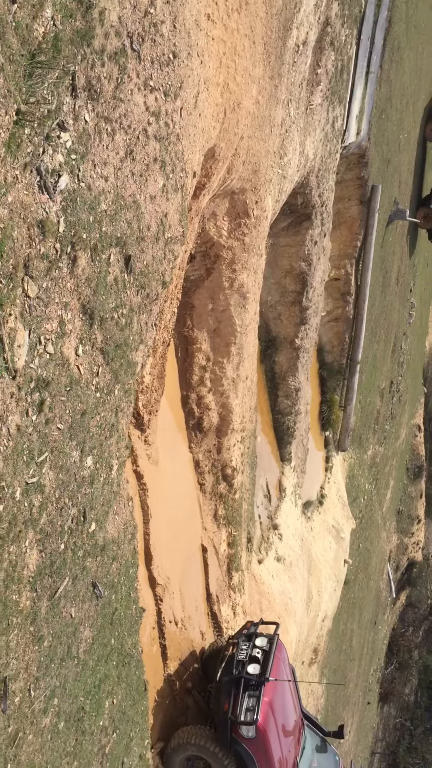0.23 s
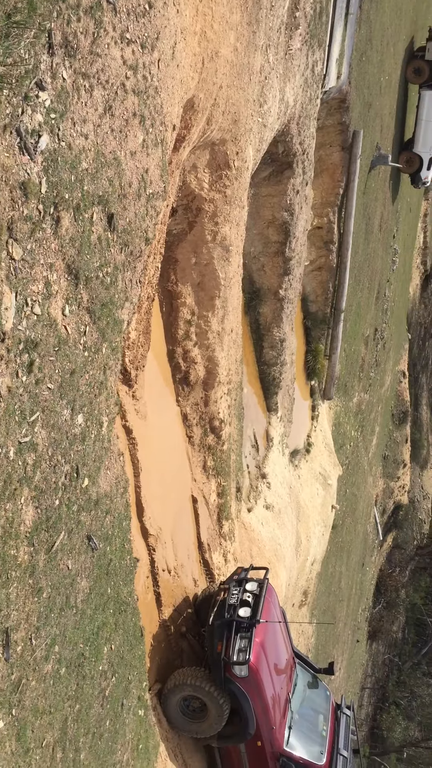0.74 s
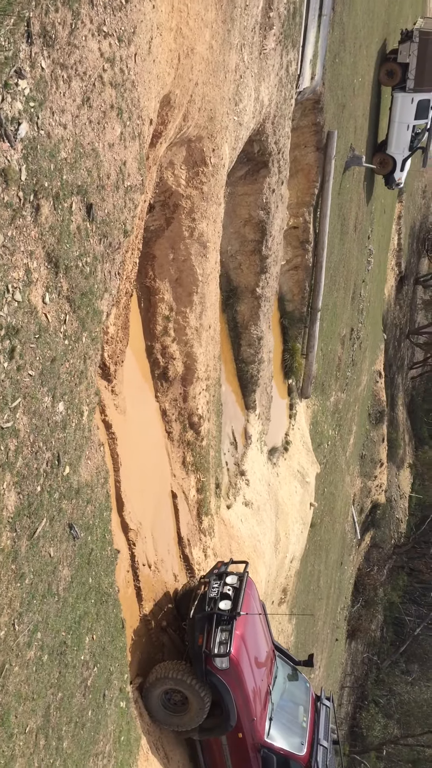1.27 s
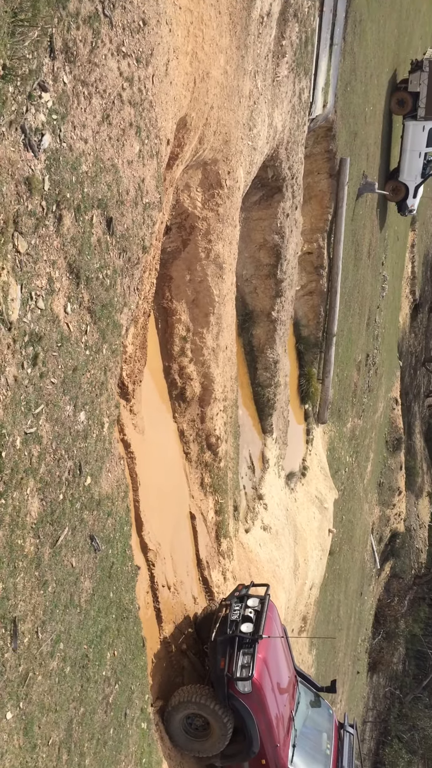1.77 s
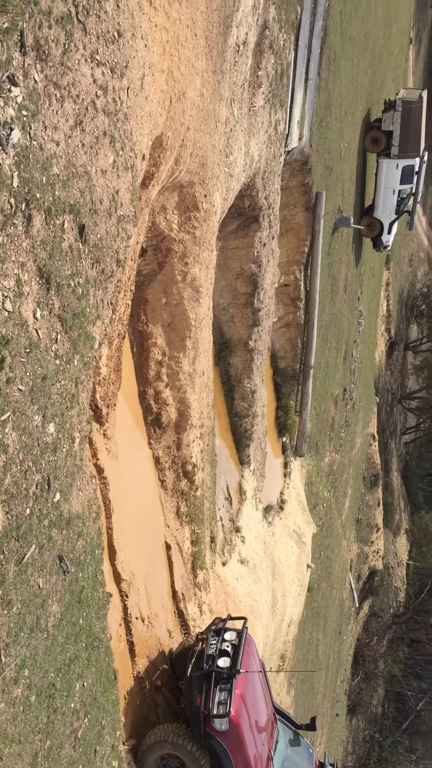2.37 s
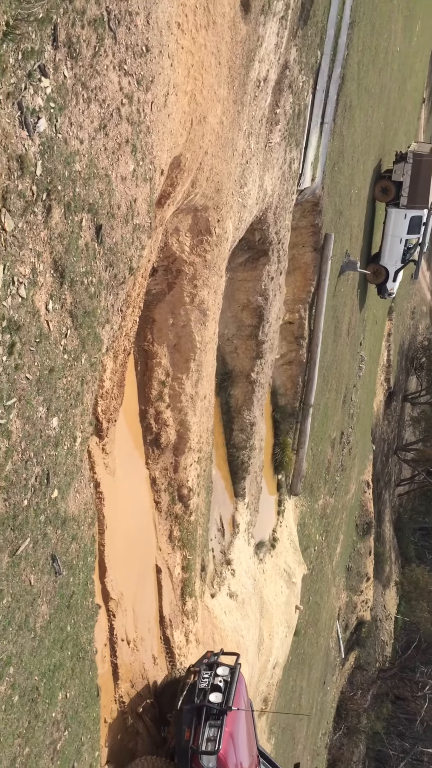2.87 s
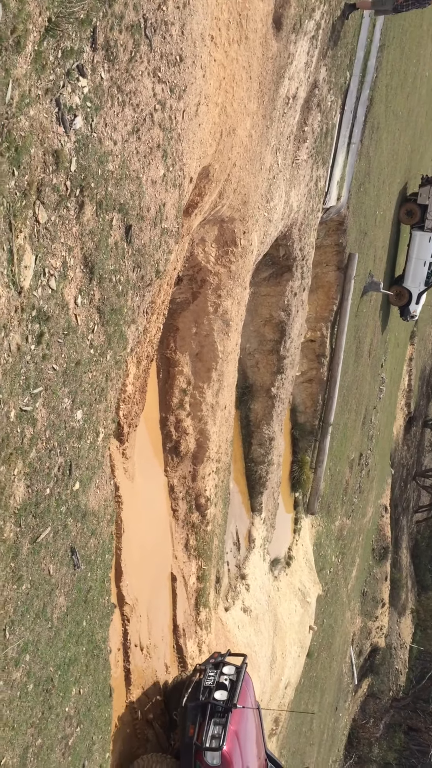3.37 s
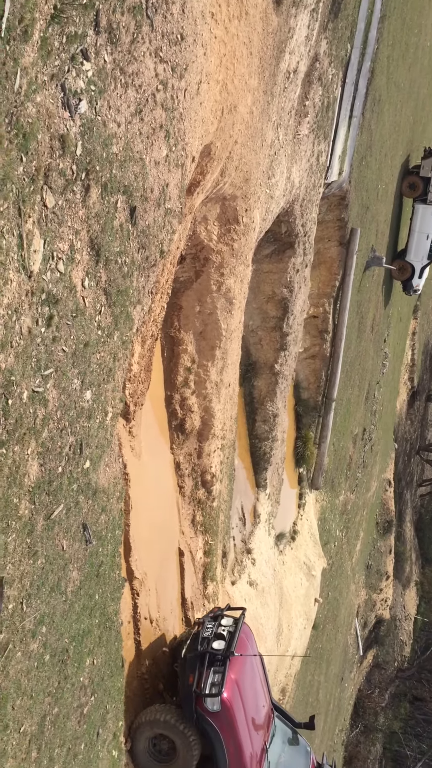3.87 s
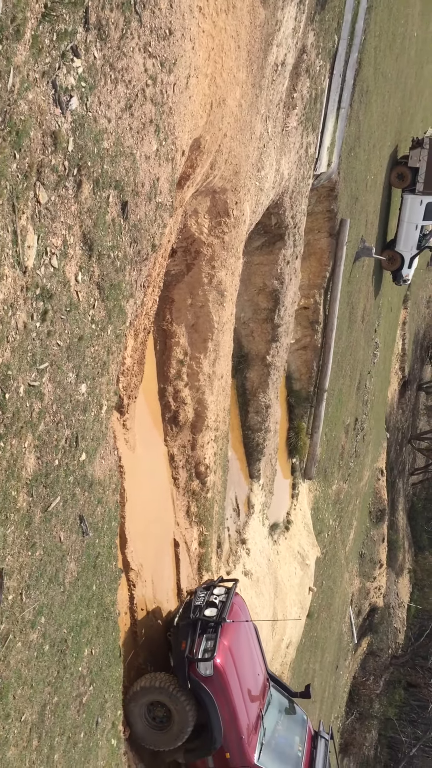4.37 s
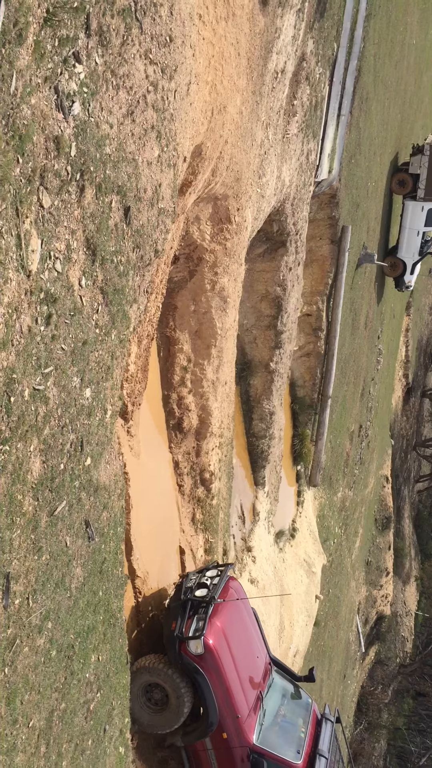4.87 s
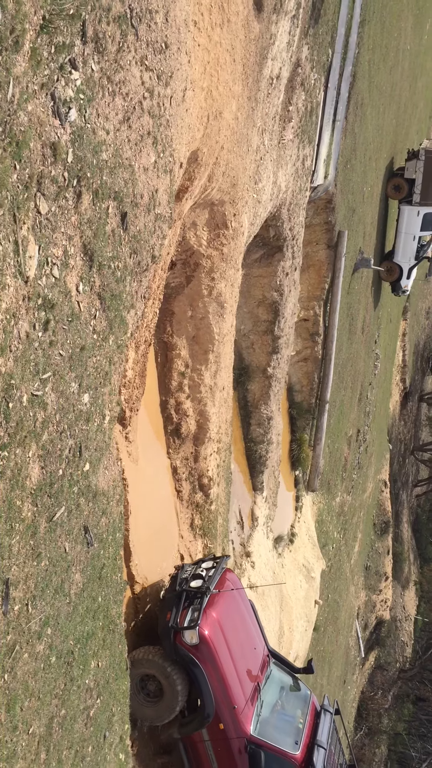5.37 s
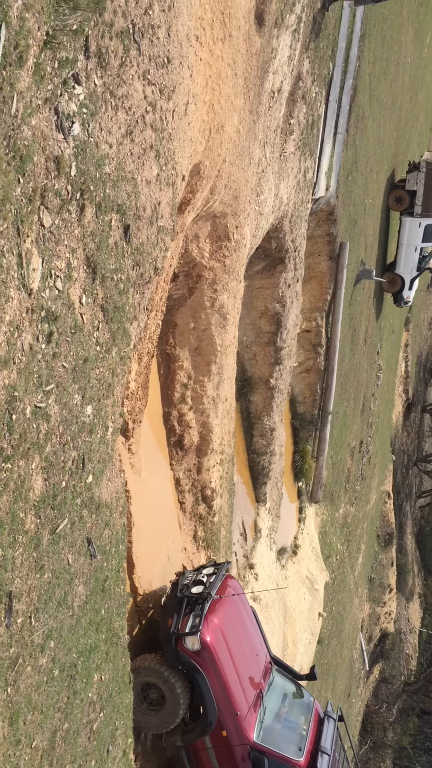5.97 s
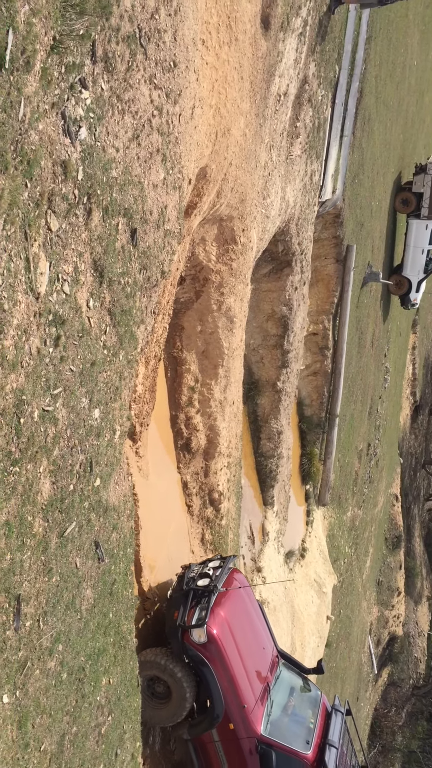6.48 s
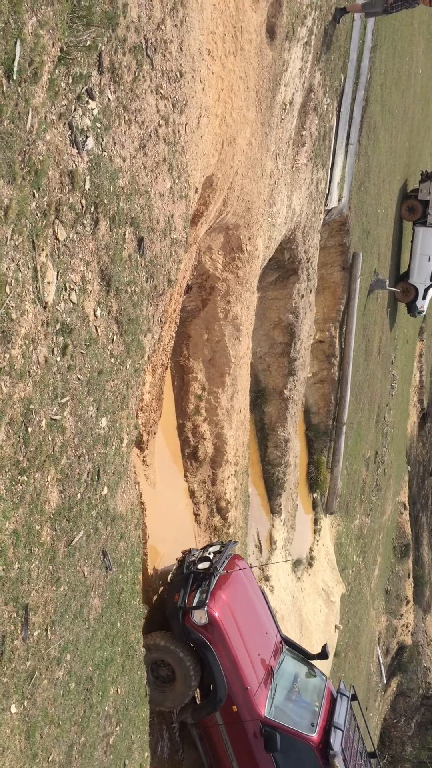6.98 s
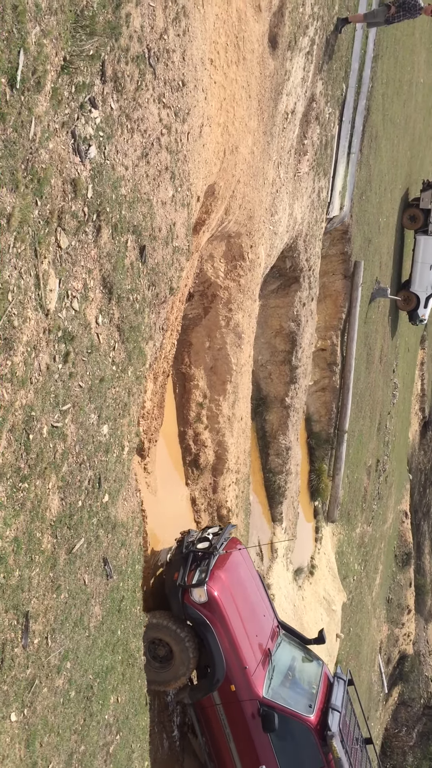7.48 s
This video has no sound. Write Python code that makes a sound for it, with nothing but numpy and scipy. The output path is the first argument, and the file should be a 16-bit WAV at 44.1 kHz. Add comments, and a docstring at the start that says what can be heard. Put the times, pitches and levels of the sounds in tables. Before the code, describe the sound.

A six-cylinder diesel off-roader idles and creeps over stones, revs up briefly with a hard clatter, then pulls unevenly through muddy ruts.

```python
"""A six-cylinder diesel off-roader, in the open: it first idles and creeps with stones ticking under its tyres,
then revs up briefly, rattles over twigs and stones, and pulls unevenly through muddy ruts to the end.
The exhaust is a sum of multiples of the firing rate plus puffs of gas; each combustion rings modes of the iron block;
shaped noise gives valve gear and fan; ticks and crunches are filtered bursts.
A faint insect whir, narrow-band noise, fades after the revs; a low wash of air lies under everything."""
import sys
import numpy as np
from scipy import signal
from scipy.fft import rfft, irfft
from scipy.io import wavfile
from scipy.ndimage import uniform_filter1d, map_coordinates

SR = 44100
rng = np.random.default_rng(int(sys.argv[2]) if len(sys.argv) > 2 else 0)


def put_to_file(sound):
    """Save the sound as 16-bit audio at rate SR, in the file named by the first command-line argument."""
    columns = np.atleast_2d(sound).T  # one column per channel
    safe = np.clip(columns, -1, 1)
    whole_steps = np.round(safe * 32767)
    wavfile.write(sys.argv[1], SR, whole_steps.astype(np.int16))


def rack_gain(trim_db):
    """Turn a fader trim in dB into the linear factor to multiply a signal by."""
    fader = np.asarray(trim_db, float)
    return 10 ** (fader / 20)


N = 340452


def rms_one(x):
    """Normalisation: scales a signal to unit rms."""
    return x / np.sqrt(np.mean(x ** 2) + 1e-20)


def even(x, seconds):
    """Levelling: divides a signal by its own running rms."""
    return x / np.sqrt(uniform_filter1d(x ** 2, int(seconds * SR)) + 1e-12)


def in_time(rows):
    """Linear interpolation: joins rows that begin with a time in seconds, one value a sample and column."""
    s, *columns = np.transpose(rows)
    return [np.interp(np.arange(N) / SR, s, c) for c in columns]


def drift(rate):
    """Slow random modulation: a smooth curve through rate random values a second, of spread about 1."""
    coarse = np.arange(0, N + 64, 64)
    smooth = map_coordinates(rng.standard_normal(800), [coarse / SR * rate % 790], order=3)
    return np.interp(np.arange(N), coarse, smooth)


def resonances(x, modes):
    """Modal filtering: parallel two-pole resonances (Hz, width in Hz, dB) of alternating sign."""
    out = np.zeros(len(x))
    for k, (hz, width_hz, db) in enumerate(modes):
        r = np.exp(-np.pi * width_hz / SR)
        b = [(1 - r * r) / 2, 0, (r * r - 1) / 2]
        a = [1, -2 * r * np.cos(2 * np.pi * hz / SR), r * r]
        out += (-1) ** k * rack_gain(db) * signal.lfilter(b, a, x + 1e-18)
    return out


def coloured(spectrum):
    """Spectral shaping: white noise weighted by (Hz, dB) points, with unit rms."""
    hz = np.maximum(np.fft.rfftfreq(N, 1 / SR), 1)
    point_hz, point_db = np.transpose(spectrum)
    db = np.interp(np.log(hz), np.log(point_hz), point_db)
    return rms_one(irfft(rfft(rng.standard_normal(N)) * rack_gain(db), N))


def bursts(firings, strength_db, decay_s):
    """Impulse excitation: a click at each firing, and the envelope that jumps there and decays exponentially."""
    clicks = np.zeros(N)
    at = np.flatnonzero(np.diff(np.floor(firings))) + 1
    clicks[at] = rack_gain(strength_db[firings[at].astype(int)])
    envelope = signal.lfilter([1], [1, -np.exp(-1 / (decay_s * SR))], clicks + 1e-18)
    return envelope, clicks


# The first six multiples of the firing rate. Each row: level in dB relative to the tailpipe's
# response, dB gained per dB of load.
HUM = [(-5.5, 2.5), (0, 2), (-0.5, 0.17), (5.5, 2), (-6.5, 1.3), (-12, 3.5)]
# The same two columns, shared by each of the multiples 7 to 14.
UPPER_HUM = (-1.5, 2.1)
# How the tailpipe passes a steady tone. Each row: frequency in Hz, level in dB.
PIPE_PASS = [(30, -85), (40, -54), (50, -49.5), (65, -39), (90, -46), (115, -41), (130, -49.5), (150, -44),
             (180, -48), (200, -47), (225, -61.5), (260, -64.5), (340, -67.5), (420, -78), (540, -86.5),
             (610, -65), (700, -87), (1100, -63)]
# Single lines of the hum. Each row: time in seconds, gain in dB of the third, fourth, fifth and sixth
# multiples, level in dB of the line at 3.5 times the firing rate (its neighbour at 4.5 follows it).
LINES_DB = [(0.2, 1.5, 1, 3, -1, -59), (1.0, 0, -8, 4.5, -11, -56), (1.8, -7, -0.5, 8, 0, -64),
            (2.6, -3, -2.5, -2, 0, -72), (2.8, -23, -6, 2, -8, -63), (2.95, -3, 8.5, -5, 0, -43),
            (3.1, -7, -0.5, 2, 4, -53), (3.4, 0.5, -1, 2, 0, -63), (3.8, -3, -4, 4, 0, -45.5),
            (4.3, -7, -2.5, 12, 4, -49.5), (4.6, -1.5, -22, 6, 0, -79), (5.0, -2.5, -3, 8.5, -10, -51),
            (5.5, -5.5, -3, 1, 0, -56), (5.75, -1, -2, 3, -4, -58), (5.86, -2, 4.5, -8, -6, -58),
            (5.95, -5, -2.5, -4, -2, -50), (6.1, 1.5, -4.5, -3, 0, -50), (6.4, -6, 0, -1, 0, -43),
            (6.7, -3, 1.5, -5, -2, -48.5), (7.0, -2, 1, 8, 0, -51), (7.5, -2, -5.5, -3, 0, -47.5)]


def exhaust_hum(firings, per_s, load_db, strength_db):
    """Harmonic synthesis: periodic firings give multiples of their rate, swelling with the stronger cylinders."""
    depth = np.clip(1.9 - per_s / 40, .15, 1)     # at speed the pipe blends the cylinders
    swell_db = depth * np.interp(firings, np.arange(len(strength_db)), strength_db)
    swell = even(rack_gain(swell_db), 0.21)
    turn = 2 * np.pi * (firings + .15)
    pass_hz, pass_db = np.transpose(PIPE_PASS)
    *single_db, between_db = in_time(LINES_DB)
    hum = rack_gain(between_db) * (np.cos(3.5 * turn) + .7 * np.cos(4.5 * turn))
    for k, (db, per_load) in enumerate(HUM + 8 * [UPPER_HUM], 1):
        db = db + per_load * load_db + np.interp(np.log(k * per_s), np.log(pass_hz), pass_db)
        db = db + min(.25 * k, 2.5) * drift(4)     # higher multiples waver more, up to a limit
        if 3 <= k <= 6:
            db = db + single_db[k - 3]
        swell_power = 1.9 if k < 3 else .6     # the lowest lines swell most
        hum += rack_gain(db) * swell ** swell_power * np.cos(k * turn - 4.4)
    return np.sqrt(2) * hum


# Resonances of the exhaust pipe. Each row: centre in Hz, width in Hz, level in dB.
PIPE = [(103, 18.5, -44), (152.4, 20, 6), (201.1, 16.5, 7.5), (285.4, 39, -7.5), (330, 52, -18)]
# The puffs swell as the load shifts. Each row: time in seconds, gain in dB.
PUFF_SWELL = [(0, 1.5), (2.62, -6), (2.73, -2), (2.85, -5), (3.0, 1.5), (3.15, -7), (3.6, 0), (4.1, -4),
              (4.36, -2), (4.46, 14), (4.53, -1), (5.7, -1), (5.83, 2.5), (5.96, 2.5), (7.72, 1.5)]


def exhaust_puffs(envelope, clicks, load_db, pull):
    """Source and filter: a click and a gust of gas at each firing excite the pipe's resonances."""
    gust = (envelope + .25) * rng.standard_normal(N)
    gas = rms_one(clicks) + .28 * rms_one(gust)
    puff = resonances(resonances(gas, PIPE), [(255.0, 67, 0)])
    db = -50 + in_time(PUFF_SWELL)[0] + 0.55 * load_db + 1.5 * drift(3.8)
    db = db + 0.2149 * pull     # dB per firing per s gained each second
    return rack_gain(db) * even(puff, 0.67)


def exhaust_lope(clicks, load_db):
    """Subharmonics: what sets the cylinders apart fills in between the multiples of the firing rate."""
    uneven = clicks - (clicks > 0) * clicks[clicks > 0].mean()
    lope = resonances(resonances(uneven, [(138, 130, 0)]), [(119, 72, 0)])
    return rack_gain(-48.5 + 0.73 * load_db) * even(lope, 0.32)


# The six cylinders in firing order, as relative strengths. Each row: exhaust in dB, knock in dB standing,
# knock in dB pulling, knock in dB once the car leans into the rut.
CYLINDERS = [(-2, -2, 0, -3), (3, -1, -5, -4), (-2, 3, 1, .5), (1, 2, 1.5, -3.5), (3, -6, -6, -7),
             (-2, -1, 2, -1.5)]


def exhaust(firings, per_s, load_db, pull):
    """Superposition: hum, puffs and lope share one random strength per firing at the tailpipe."""
    count = np.arange(int(firings[-1]) + 2)
    strength_db = np.array(CYLINDERS)[count % 6, 0] + .5 * rng.standard_normal(len(count))
    envelope, clicks = bursts(firings, 0.28 * strength_db, decay_s=0.019)
    hum = exhaust_hum(firings, per_s, load_db, strength_db)
    return hum + exhaust_puffs(envelope, clicks, load_db, pull) + exhaust_lope(clicks, load_db)


# The exhaust arrives later than the knock of the same firing. Each row: time in seconds, lag in seconds
# before .43 of a firing is taken off.
PIPE_LAG = [(2.5, .0275), (2.8, .030), (4.3, .028), (5, .024)]


def knock_clock(firings):
    """Propagation delay: the count of firings as heard at the block, ahead of the tailpipe."""
    time = np.arange(N) / SR
    return np.maximum(np.interp(time + in_time(PIPE_LAG)[0], time, firings) - .43, 0)


# Times in seconds: standing until, pulling from, pulling until, leaning from.
STANCE_S = (2.55, 2.7, 4.45, 4.8)
# Single firings that knock harder or softer. Each row: time in seconds, dB over their usual strength.
HARD_KNOCKS = [(.788, 2), (.818, 2), (1.13, -1.5), (1.611, 0.5), (2.115, 1.5), (2.275, -0.5), (2.487, 3),
               (2.563, 1), (2.591, 6), (2.64, -2), (2.7, 7), (2.759, -2), (2.78, 2.5), (2.8, 3), (2.862, 3),
               (3.737, 2), (4.16, 4.5), (4.43, 0), (5.778, 4.5), (5.85, 2.5), (6.286, 6), (7.21, 4.5),
               (7.35, 1.5)]


def knock_strengths(early):
    """Cyclic variation: a strength in dB per firing from its cylinder, the stance and chance; also the lean."""
    time = np.arange(N) / SR
    count = np.arange(int(early[-1]) + 2)
    at = np.interp(STANCE_S, time, early)
    standing = np.interp(count, at[:2], [1, 0])
    leaning = np.interp(count, at[2:], [0, 1])
    _, standing_db, pulling_db, leaning_db = np.array(CYLINDERS)[count % 6].T
    usual_db = standing * standing_db + (1 - standing - leaning) * pulling_db + leaning * leaning_db
    strength_db = usual_db + .7 * rng.standard_normal(len(count))
    hard_s, hard_db = np.transpose(HARD_KNOCKS)
    strength_db[np.round(np.interp(hard_s, time, early)).astype(int)] += hard_db
    return strength_db, leaning


# Modes of the engine block. Each row: centre in Hz, width in Hz, level in dB, dB gained as the car leans
# its flank to the listener.
BLOCK = [(600, 33.3, 5, -13), (640, 148, 1.5, -11), (690, 35, -2, -9), (866, 92.4, 0.5, 3),
         (1077, 150, -2.5, 7), (1312, 170, 12.5, -1), (1477, 180, 14.5, -2), (1637, 160, -3, 14.5),
         (1835, 160, -12.5, 18.5), (2200, 380, 3, -1.5), (2783, 590, -1.5, -1.5), (3160, 560, -2.5, -0.5),
         (3580, 350, -7.5, -16), (4480, 440, -18, -7), (4470, 210, -8.5, 1.5)]


def knocks(early, strength_db, leaning, effort_db):
    """Modal excitation: each combustion strikes the block's modes, each with a strength and pitch of its own."""
    firing_count = len(strength_db)
    now = early.astype(int)
    upper_db = 1.2 * rng.standard_normal(firing_count)     # a chance shared by the upper modes
    rise = np.exp(-1 / (.0022 * SR))     # time constant in seconds
    knock = np.zeros(N)
    for hz, width_hz, db, lean_db in BLOCK:
        share = 1 if 1250 < hz < 1700 else .7     # outside this band cylinders differ less
        own_db = share * strength_db + lean_db * leaning + (hz > 2000) * upper_db
        own_db = own_db + 1.0 * rng.standard_normal(firing_count)
        envelope, _ = bursts(early, own_db, decay_s=.005)
        swing = signal.lfilter([1], [1, -2 * rise, rise ** 2], envelope)     # a soft onset
        blow_hz = hz + .25 * width_hz * rng.standard_normal(firing_count)[now]     # off the mode's centre
        phase = 2 * np.pi * (np.cumsum(blow_hz) / SR + rng.random(firing_count)[now])
        blow = 1.1 * np.sqrt(2 * np.pi * width_hz / SR) * np.cos(phase)     # new each firing
        shake = resonances(.45 * swing * rng.standard_normal(N), [(hz, width_hz, db)])
        shake = shake + resonances(swing * blow, [(hz, 2.5 * width_hz, db - 2.5)])
        rasp_db = 0.35 * effort_db * (hz > 3000)     # upper modes gain more under effort
        knock += rack_gain(rasp_db) * shake
    muffle = signal.butter(4, 5000, fs=SR, output="sos")     # iron and bonnet muffle the top
    return signal.sosfilt(muffle, knock)


# Spectrum of the valve gear. Each row: frequency in Hz, relative density in dB per Hz.
CLATTER = [(190, -3), (330, -3.5), (380, -7.5), (430, -10), (500, -12.5), (841, -8.5), (1110, -8),
           (1490, -5), (1730, -10), (2850, -11.5), (3440, -21), (4470, -24), (5000, -36), (5530, -41),
           (6500, -42.5), (8450, -45), (14300, -120)]


def valve_clatter(early, strength_db, effort_db):
    """Modulated noise: valve gear partly follows the cylinders and thickens over the knocks under effort."""
    cylinder_db = .4 * np.interp(early - .3, np.arange(len(strength_db)), strength_db)
    return coloured(CLATTER) * rack_gain(1.5 * drift(45) + cylinder_db + .15 * (effort_db - 3))


def block(early, strength_db, leaning, block_db):
    """Structure-borne sound: knocks and valve clatter, levelled together and set to the engine's loudness."""
    effort_db = block_db + 46     # over a crawl
    knock = rms_one(knocks(early, strength_db, leaning, effort_db))
    clatter = 1.2 * valve_clatter(early, strength_db, effort_db)
    return rack_gain(block_db + 1.0) * even(knock + clatter, .25)


def bank_echo(iron):
    """Specular reflection: the bank returns the block's sound once, later and weaker."""
    lag = int(0.0092 * SR)
    return rack_gain(-14.0) * np.r_[np.zeros(lag), iron[:-lag]]


# A narrow ring that comes and goes under load. Each row: time in seconds, frequency in Hz, level in dB.
RING = [(2.7, 690, -77), (2.85, 700, -51), (2.97, 690, -60), (3.1, 690, -66), (3.25, 685, -49),
        (3.36, 640, -66), (3.5, 600, -54), (3.68, 611, -53), (3.85, 610, -58), (4.1, 600, -80)]


def ring():
    """Frequency modulation: a narrow tone wavers in level and pitch."""
    hz, db = in_time(RING)
    phase = 2 * np.pi * np.cumsum(hz + 8 * drift(25)) / SR
    return np.sqrt(2) * rack_gain(db + 2.5 * drift(14)) * np.cos(phase)


# Spectrum of the bright hiss. Each row: frequency in Hz, relative density in dB per Hz.
RUSTLE = [(3060, -0.5), (4000, 0), (4900, 2), (5200, 4), (5540, 6.5), (7700, -9), (8440, -6),
          (11800, -14.5), (15500, -25)]
# Course of the hiss. Each row: time in seconds, relative level in dB.
HISS = [(0.0, -67.5), (0.34, -69.5), (2.49, -65.5), (2.69, -57.5), (2.82, -50.5), (2.9, -51), (3.1, -54.5),
        (3.44, -57), (3.83, -59.5), (4.67, -67), (4.9, -64), (5.1, -68.5), (5.59, -67.5), (6.39, -61.5),
        (6.64, -63.5), (6.79, -65.5), (7.72, -69)]


def rustle(early, strength_db):
    """Amplitude modulation: the bright noise of fan and injectors is partly pulsed by the firings."""
    envelope, _ = bursts(early, strength_db, decay_s=.006)
    pulse = even(1.1 + rms_one(envelope) * 0.25, 0.2)
    return rack_gain(in_time(HISS)[0] - 0.5 + 1.8 * drift(30)) * coloured(RUSTLE) * pulse


# Ticks under the tyres. Each row: start in seconds, peak in dB before the ground echo, centre in Hz.
TICKS = [(0.13, -33, 3560), (0.1327, -43, 13500), (0.136, -31, 3870), (.143, -55, 12000),
         (1.703, -37.5, 8300), (1.9362, -39, 6950), (1.952, -35, 6070), (2.331, -51, 8000),
         (4.5087, -26, 2750), (4.5084, -47, 8500), (4.5765, -28, 3430), (4.5764, -54, 11500),
         (4.707, -60, 8000), (4.839, -29, 2800), (7.13, -50, 9000), (7.39, -49, 5500)]


def tyre_ticks():
    """Impulse response: a sharp snap through a broad, quickly dying resonance makes a tick."""
    out = np.zeros(N)
    for s, db, hz in TICKS:
        grit = rng.standard_normal(400) * np.exp(-np.arange(400) / SR / .0006)
        snap = (np.arange(400) == 0) + .08 * grit
        band = [(hz, .7 * hz, 0)]
        click = resonances(resonances(snap, band), band)
        out[int(s * SR):int(s * SR) + 400] += rack_gain(db) * click / np.abs(click).max()
    return out


# The tyre crunches through loose stones. Each row: start in seconds, length in seconds (fall to 1/e, though
# all end by 0.136 s), level in dB of the grains before they are faded, centre in Hz.
CRUNCHES = [(0.131, 0.014, -35.5, 315), (0.132, 0.011, -43, 520), (0.137, 0.046, -42, 253),
            (0.125, 0.021, -48, 1510), (0.126, 0.025, -69, 13000), (0.322, 0.027, -42.5, 262),
            (0.431, 0.059, -50, 296), (1.921, 0.076, -63, 9000), (1.962, 0.065, -45.5, 270),
            (4.702, 0.29, -55.5, 2480), (4.752, 0.041, -36.5, 1550), (4.76, 0.079, -76, 6360),
            (4.763, 0.024, -42, 504), (4.789, 0.015, -46, 2200), (4.792, 0.016, -38.5, 640),
            (4.832, 0.025, -47, 2200), (4.967, 0.04, -46, 1280), (5.0, 0.025, -45.5, 1400),
            (5.021, 0.034, -43, 950), (5.179, 0.03, -52, 2000), (6.874, 0.042, -49, 670),
            (6.898, 0.027, -43, 300), (6.927, 0.019, -38, 310), (6.93, 0.034, -47, 700),
            (7.452, 0.037, -46, 680)]


def tyre_crunches():
    """Granular noise: dense uneven grains in clumps pass a band around their centre."""
    out = np.zeros(N)
    time = np.arange(6000) / SR
    for s, length, db, hz in CRUNCHES:
        grains = rng.standard_normal(6000) * rack_gain(1.8 * np.minimum(rng.exponential(1, 6000), 4))
        grains *= rack_gain(3 * np.interp(time, np.arange(40) / 250, rng.standard_normal(40)))     # in clumps
        width = .55 if hz < 900 else 1.2     # share of the centre; low crunches are dull thuds
        band = [(hz, width * hz, 0)]
        shape = np.clip(time / 0.0009, 0, 1) * np.exp(-(time / length) ** 3)
        crunch = rms_one(resonances(resonances(grains, band), band))
        out[int(s * SR):int(s * SR) + 6000] += rack_gain(db) * shape * crunch
    return out


# The echo off the ground cancels one band. Each row: centre in Hz, width in Hz, level in dB of the part
# that is subtracted.
GROUND_DIP = [(416, 115, -5.5)]


def over_ground(car):
    """Destructive interference: the echo off the ground takes a band out of the car's sound."""
    return car - resonances(car, GROUND_DIP)


# Course of the insect's whir. Each row: time in seconds, level in dB about which it wavers.
WHIR = [(0, -88), (2.5, -89), (4.3, -88), (5, -95), (7.72, -95)]


def insect():
    """Narrow-band noise: two passes through one sharp resonance give a thin wavering whir high up."""
    mode = [(12000, 170, 0)]
    whir = rms_one(resonances(resonances(rng.standard_normal(N), mode), mode))
    return rack_gain(in_time(WHIR)[0] + 2.0 * drift(2.2)) * whir


def open_air():
    """Filtered noise: a low band makes the wash of open air, a high-pass its faint even hiss."""
    low = signal.butter(3, [62, 170], "band", fs=SR, output="sos")
    high = signal.butter(2, 7000, "high", fs=SR, output="sos")
    wash = rms_one(signal.sosfilt(low, rng.standard_normal(N)))
    hiss = signal.sosfilt(high, rng.standard_normal(N))
    return rack_gain(-61) * wash + rack_gain(-76.5) * hiss


# Engine speed. Each row: time in seconds, firings per second.
SPEED = [(0.0, 33.03), (0.32, 31.05), (1.47, 38.01), (2.57, 37.55), (2.93, 65.41), (3.13, 69.1),
         (3.48, 60.28), (3.71, 50.19), (4.03, 49.65), (4.48, 42.2), (4.72, 28.01), (5.09, 38.46),
         (5.3, 41.56), (5.69, 39.84), (5.89, 49.3), (6.16, 45.93), (6.42, 47.72), (6.69, 45.62),
         (6.83, 39.52), (7.72, 39.6)]
# Load on the engine, as heard at the tailpipe. Each row: time in seconds, dB over a steady crawl.
LOAD = [(0, -6), (.8, -2.5), (1.6, -3.5), (2.55, -4), (2.7, 3.5), (2.9, 6), (3.1, 6.5), (3.3, 5.5),
        (3.6, 2.5), (3.9, 3.5), (4.45, 0), (4.65, -4.5), (4.9, -1), (5.25, -0.5), (5.5, -3), (5.7, -0.5),
        (5.85, 3), (6, -1), (6.4, 2.5), (6.75, 0), (6.88, -5.5), (7.05, -1.7), (7.72, -1)]
# Loudness of the engine block. Each row: time in seconds, relative level in dB.
EFFORT = [(0, -48.5), (.56, -49.5), (1.0, -47.5), (1.9, -45.5), (2.62, -44.5), (2.64, -34.5), (2.67, -36),
          (2.72, -36), (2.87, -34), (3.05, -36.5), (3.33, -40), (3.6, -37.5), (4.44, -40.5), (4.49, -46.5),
          (4.65, -48.5), (4.77, -41), (4.9, -45.5), (5.2, -43.5), (5.6, -46), (5.84, -42), (5.94, -45.5),
          (6.3, -41), (6.69, -42), (6.82, -49), (6.92, -44.5), (7.72, -46.5)]


def scene():
    """Superposition: engine and tyres over the ground, an echo of the block off the bank, insect and air."""
    per_s = in_time(SPEED)[0]
    firings = .13 + np.cumsum(per_s) / SR
    climb = np.maximum(np.gradient(per_s) * SR, 0)
    pull = uniform_filter1d(climb, int(.2 * SR))     # how fast the revs climb
    early = knock_clock(firings)
    strength_db, leaning = knock_strengths(early)
    iron = block(early, strength_db, leaning, in_time(EFFORT)[0])
    engine = exhaust(firings, per_s, in_time(LOAD)[0], pull) + iron + bank_echo(iron)
    engine = engine + ring() + rustle(early, strength_db)
    car = engine + tyre_ticks() + tyre_crunches()
    return (over_ground(car) + insect() + open_air())[None]


def band_limit(x):
    """A steep low-pass at the top of the band."""
    return signal.sosfilt(signal.butter(12, 15750, fs=SR, output="sos"), x)


def record(dry):
    """High-pass filtering: the microphone drops the deepest bass steeply."""
    low_cut = signal.butter(8, 41, "high", fs=SR, output="sos")
    mix = signal.sosfilt(low_cut, dry)
    return band_limit(mix)


dry = scene()
out = record(dry)
put_to_file(out)
```